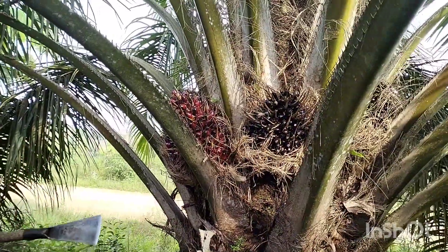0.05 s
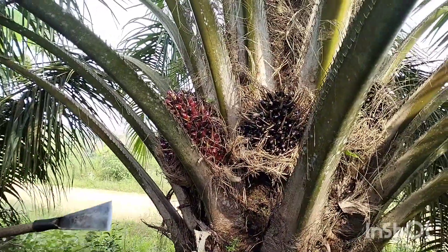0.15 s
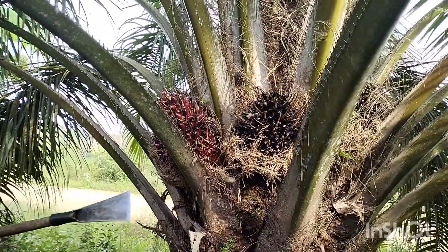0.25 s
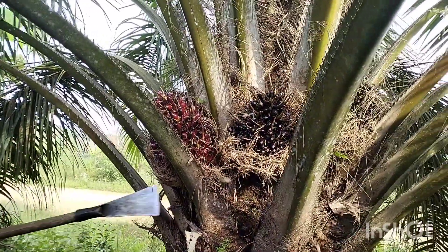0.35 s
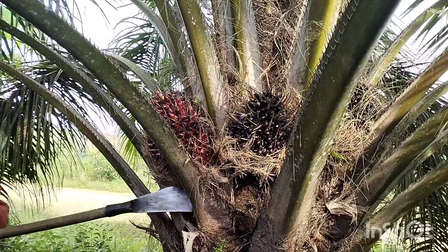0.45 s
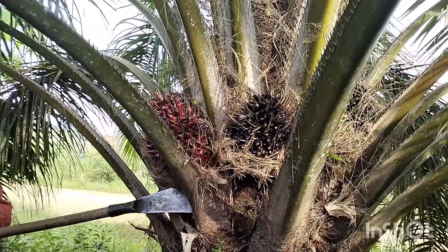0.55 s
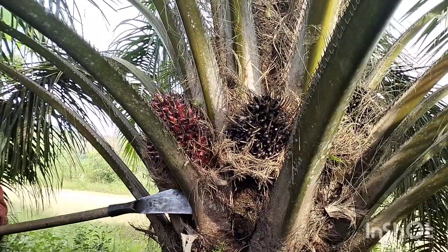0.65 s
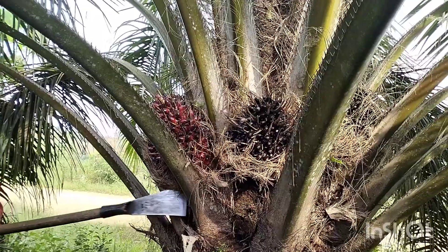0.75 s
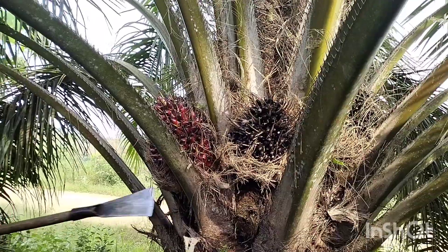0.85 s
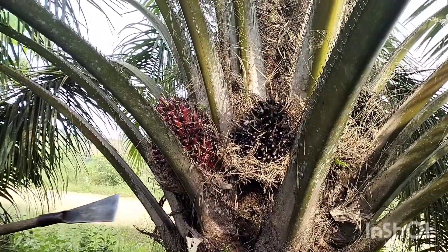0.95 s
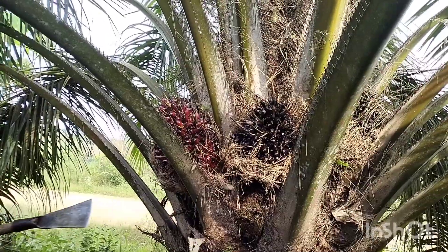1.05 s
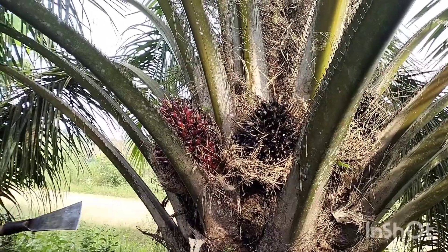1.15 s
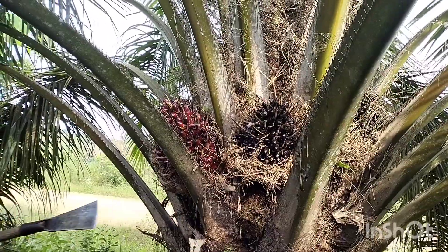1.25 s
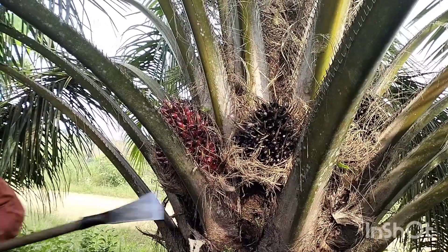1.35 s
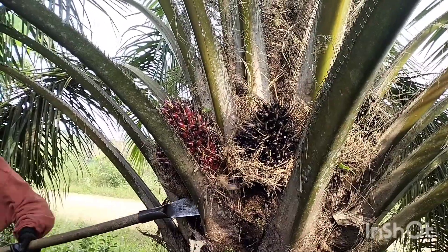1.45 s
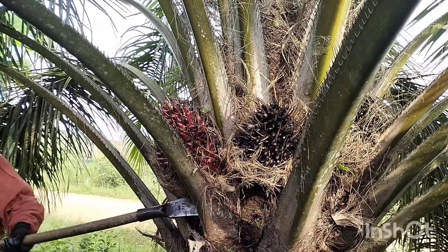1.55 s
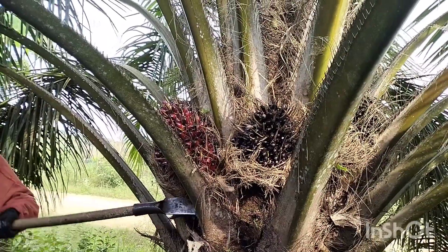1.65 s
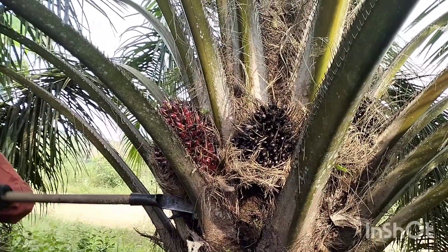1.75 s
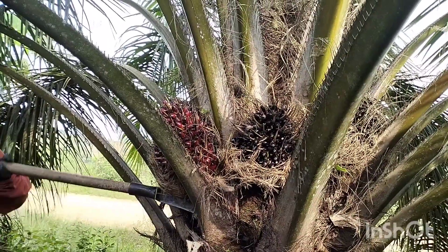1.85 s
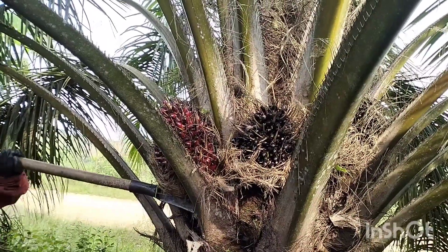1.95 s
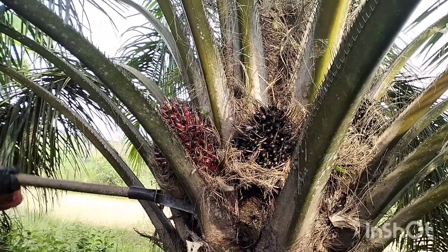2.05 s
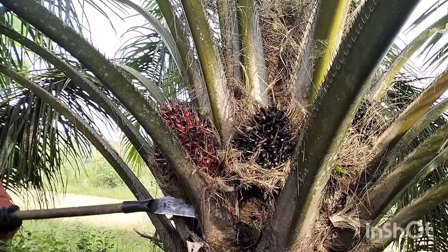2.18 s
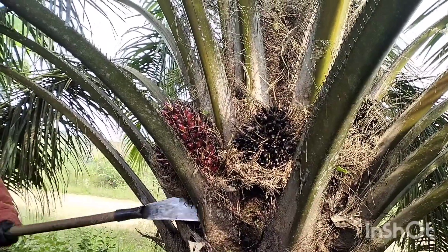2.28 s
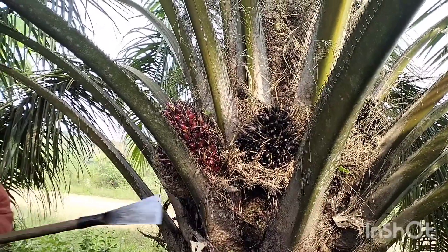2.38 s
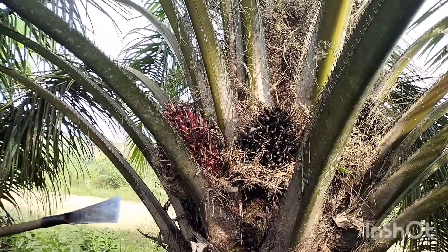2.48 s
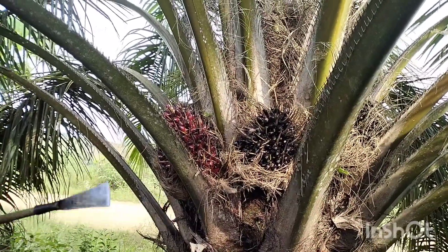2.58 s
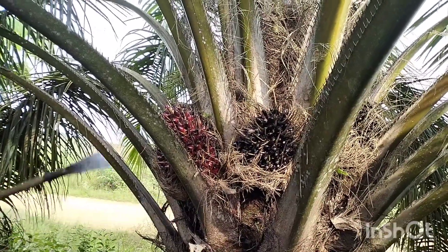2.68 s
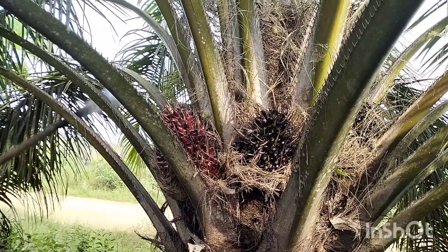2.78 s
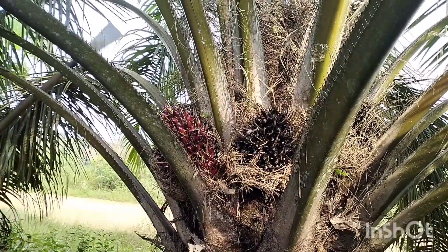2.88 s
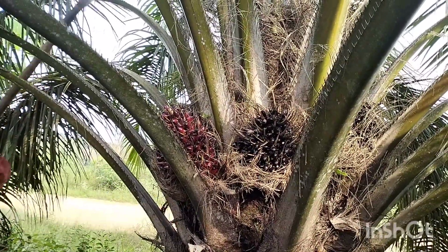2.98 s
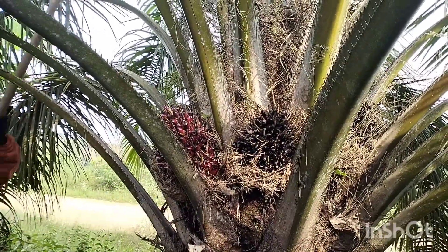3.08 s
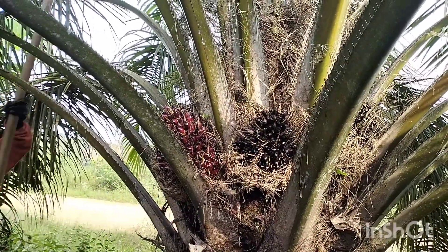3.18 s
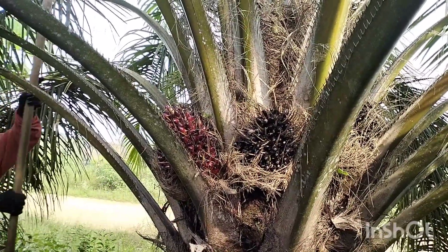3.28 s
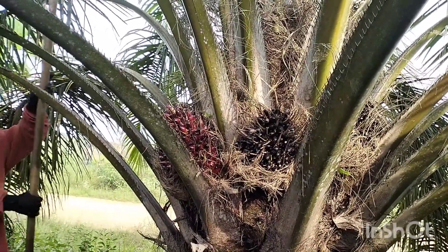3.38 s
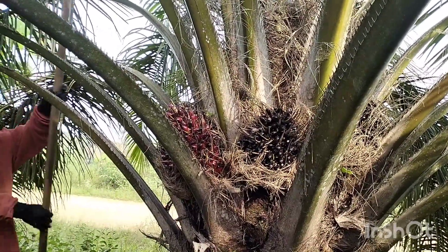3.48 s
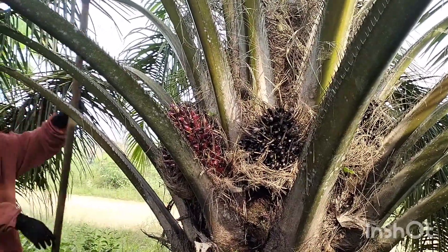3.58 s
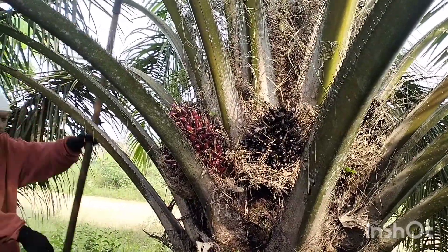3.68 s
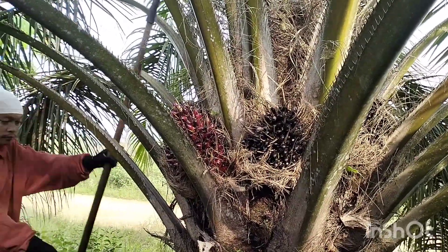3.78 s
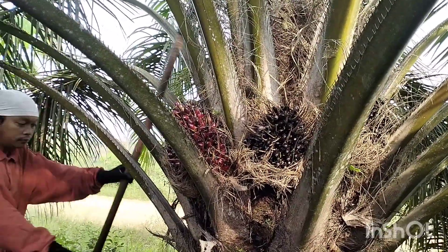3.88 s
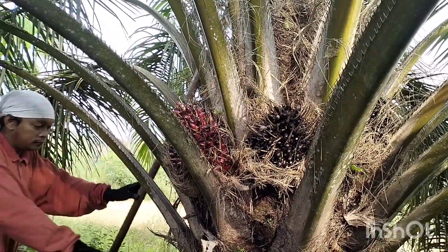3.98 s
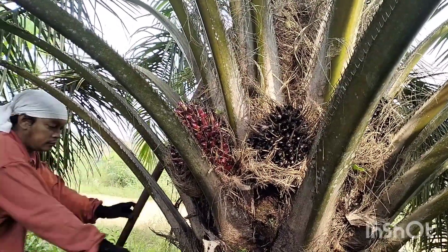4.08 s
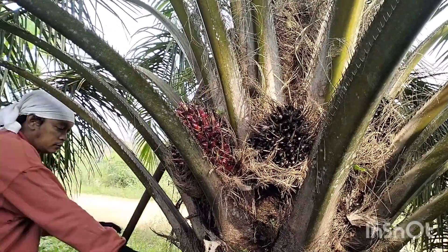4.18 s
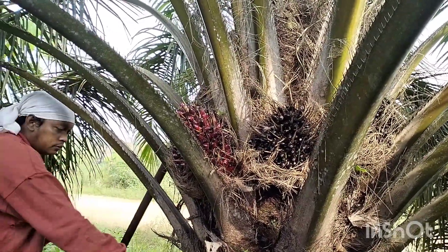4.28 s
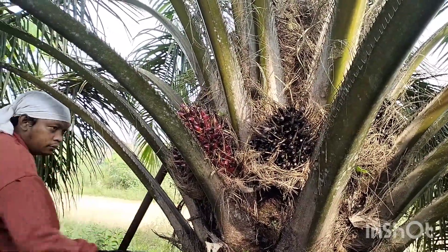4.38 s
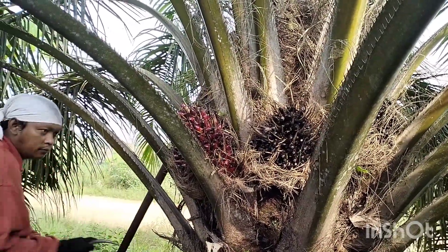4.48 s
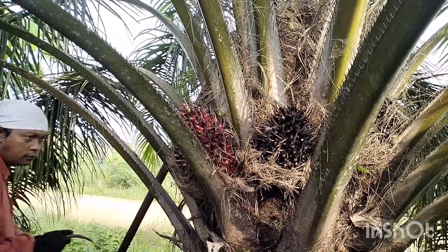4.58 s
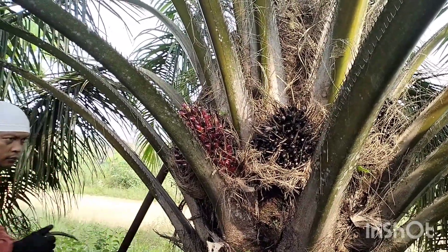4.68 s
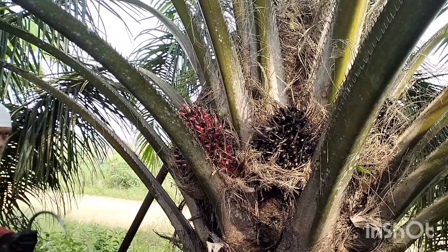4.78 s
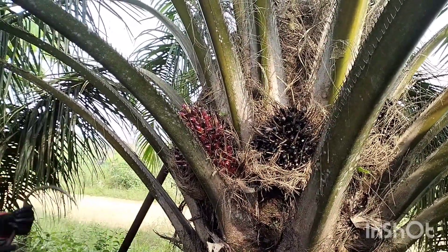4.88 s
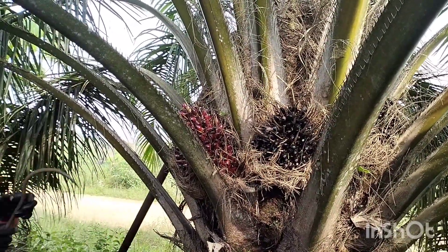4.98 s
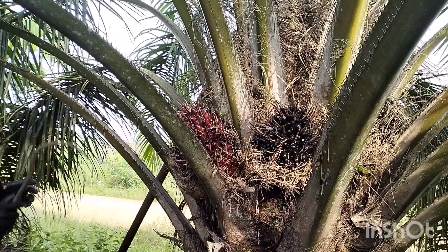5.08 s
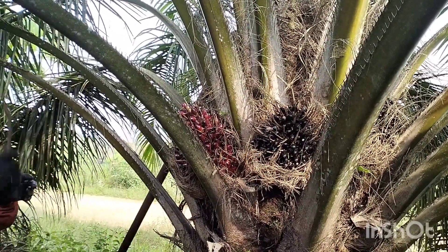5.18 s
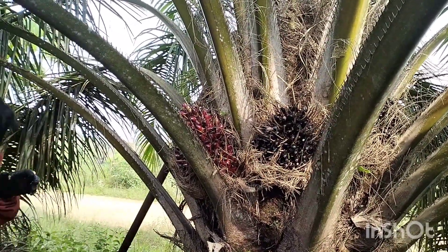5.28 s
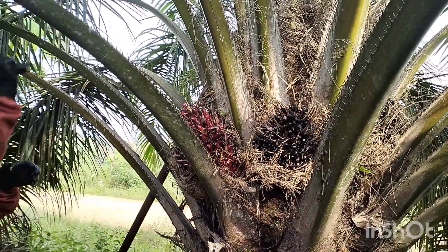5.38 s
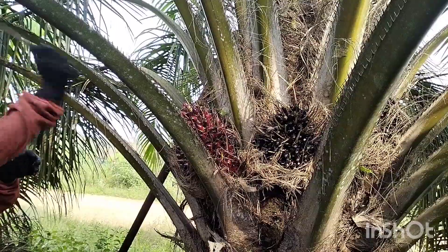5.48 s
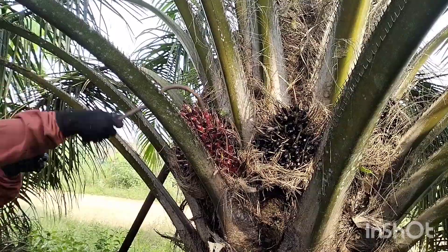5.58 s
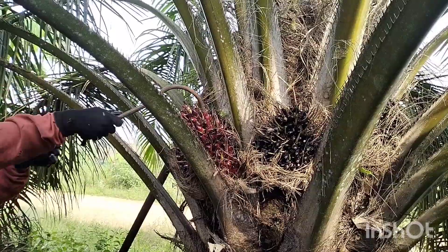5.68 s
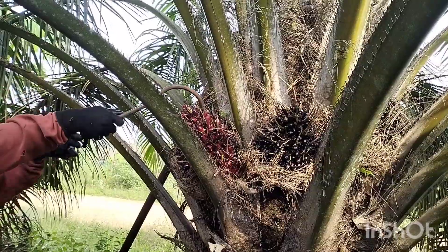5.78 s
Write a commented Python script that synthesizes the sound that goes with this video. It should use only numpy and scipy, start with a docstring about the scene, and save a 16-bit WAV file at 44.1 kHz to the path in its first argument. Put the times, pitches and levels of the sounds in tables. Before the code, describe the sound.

A blade on a pole bites into a wet palm frond base, which creaks and tears, over shrill insects and a distant engine rumble.

```python
"""Insects shrill, a far engine rumbles and leaves stir; a few far birds call as a chisel on a pole works on an oil palm.
The blade bites into a wet frond base, then is levered until the fibres creak and tear; knocks and leaf sweeps follow.
Insects, air and rumble are filtered noise; the engine note, birds and knocks are swept or damped sines.
Bites and creaks are pulses of snapping fibres that drive resonances of the frond and scatter through the crown."""
import sys
import numpy as np
from scipy import signal
from scipy.fft import rfft, irfft, next_fast_len
from scipy.io import wavfile
from scipy.ndimage import uniform_filter1d

SR = 44100
rng = np.random.default_rng(int(sys.argv[2]) if len(sys.argv) > 2 else 0)


def digitize_waveform(pressure):
    """Quantize a signal to 16-bit integers and store it at the path in sys.argv[1].

    Rows of a 2-D input are taken as channels; values are limited to [-1, 1].
    """
    field = np.atleast_2d(pressure).T
    bounded = np.clip(field, -1, 1)
    quanta = np.round(bounded * 32767).astype(np.int16)
    wavfile.write(sys.argv[1], SR, quanta)


N = 257575
TIME_S = np.arange(N) / SR
BLOW_SAMPLES = SR // 3  # span of one blow

# Table levels are relative; trims in the functions add to them. Spectra: f/Hz, level per Hz/dB.
# far engine, firing rate: t/s, f/Hz
ENGINE_SPEED = [(0, 151.8), (4.4, 158.1), (4.85, 180.1), (5.84, 184.2)]
# far engine, rumble spectrum: f/Hz, level/dB
RUMBLE_SPECTRUM = [(12, -55), (20, -41.5), (33, -13.5), (60, -7), (75, -9.5), (119, 2.5), (150, -1),
                   (177, 1.5), (195, -2.5), (211, -15), (330, -22.5), (430, -54.5), (730, -120)]
# hush of the plantation, spectrum: f/Hz, level/dB
AIR_SPECTRUM = [(200, -8.5), (300, -2.5), (420, -3), (750, 3), (1100, -3.5), (2400, -0.5), (3800, -9.5),
                (8500, -31), (11000, -17.5), (13500, -10), (15000, -22.5)]
# far insect chorus, spectrum: f/Hz, level/dB
INSECT_SPECTRUM = [(3700, -36.5), (4100, -10), (4500, 1.5), (4850, -4), (5250, 2), (5550, -3.5),
                   (5900, -13.5), (6400, -5.5), (7200, -8), (7800, -44)]
# blade or sleeve sweeping past leaves: closest touch t/s, swell time/s, rub level/dB, dry rustle level/dB
LEAF_SWEEPS = [(2.158, 0.059, -43.5, -64), (2.335, 0.066, -34.5, -55.5), (3.56, 0.29, -55.5, -56),
               (3.87, 0.075, -55, -52.5), (4.127, 0.037, -36.5, -38.5), (4.732, 0.028, -46, -57),
               (5.21, 0.1, -48.5, -49)]
# light taps on dry leaf stubs: t/s, level/dB
STUB_TAPS = [(0.835, -39), (0.854, -38.5), (2.086, -38), (2.328, -25.5), (2.752, -43.5), (3.24, -44),
             (3.703, -31), (4.638, -37)]
# leaf rub and stub tap, spectrum: f/Hz, level/dB
RUB_SPECTRUM = [(200, -25.5), (450, 3), (900, 1), (1500, -2), (2500, -1.5), (4000, -14), (8000, -24.5),
                (14000, -24)]
# dry leaf rustle, spectrum: f/Hz, level/dB
RUSTLE_SPECTRUM = [(2000, -1.5), (4000, 7), (7000, -4), (10000, 0), (13000, 2), (15000, -5)]
# far bird calls: t/s, length/s, start f/Hz, end f/Hz, level/dB
BIRD_CALLS = [(0.512, 0.12, 2320, 2300, -41.5), (0.946, 0.075, 2350, 2070, -48),
              (4.70, 0.06, 1640, 1800, -43), (4.772, 0.071, 3050, 3200, -48),
              (4.904, 0.09, 2770, 2203, -46), (4.978, 0.08, 2910, 3010, -45.5)]
# blade or pole striking the palm: t/s, time until the blade stops/s, stalk level/dB, low weight level/dB,
# crack level/dB, splinter level/dB, splinter dryness/(dB per octave), best-driven f/Hz
BITES = [(0.592, 0.012, -19, -28, -23.5, -26, -4, 433), (1.519, 0.023, -8.5, -13, -11.5, -18, -2, 435),
         (2.396, 0.0052, -26, -38, -25, -30.5, 4, 607), (2.421, 0.0034, -39, -42.5, -34.5, -44, 6, 580),
         (4.089, .009, -19.5, -33, -24.5, -19.5, 3, 539), (4.155, .004, -33, -41, -31.5, -36, -2, 524),
         (4.171, 0.0052, -35, -42, -29, -34.5, -0.5, 520), (5.504, 0.0031, -55, -65, -40.5, -38.5, 1, 700),
         (5.688, .005, -17.5, -17, -24.5, -19.5, -3.5, 490)]
# modes of the struck frond base: f/Hz, width/Hz, level/dB
STALK_MODES = [(409, 16, -2), (490, 89, 9.5), (554, 59, 8.5), (760, 110, 4), (875, 51, 13),
               (1327, 110, -5.5), (1940, 110, 1), (2170, 80, -5.5), (3320, 190, -5)]
# low weight of a bite, spectrum: f/Hz, level/dB
WEIGHT_SPECTRUM = [(60, -22), (130, -6.5), (260, 11.5), (340, -1), (600, -43.5)]
# cracking fibres, spectrum: f/Hz, level/dB
CRACK_SPECTRUM = [(600, -18.5), (1200, -7), (1800, -4), (2400, -1), (3300, -9.5), (4500, -28.5),
                  (8000, -41)]
# splintering fibres before the dryness tilt, spectrum: f/Hz, level/dB
SPLINTER_SPECTRUM = [(2200, -23.5), (3600, 0.5), (5000, 1), (7000, -3), (9500, -6), (12800, -1),
                     (15000, -11)]
# dull knocks of pole, trunk and feet: t/s, level before the soft rise/dB, f/Hz, t60/s
KNOCKS = [(0.832, -29, 622, 0.057), (1.554, -10.5, 123, 0.11), (2.162, -25, 389, 0.086),
          (3.717, -27.5, 68, 0.15), (5.693, -22, 187, 0.17), (5.694, -29, 71, 0.13)]
# jerks of the wedged blade, a faint one first, then hard ones: t/s, level/dB
JERKS = [(1.645, -32.5), (1.651, -12), (1.695, -13.5), (1.699, -13), (1.711, -16), (1.771, -9)]
# effort of levering, as creak level: t/s, level/dB
LEVER_EFFORT = [(1.69, -18.5), (1.698, 1), (1.704, -15.5), (1.8, -12), (1.844, -23.5), (1.888, -23.5),
                (1.914, -33), (1.99, -24)]
# modes of the frond with the blade wedged in it: f/Hz, width/Hz, level/dB
WEDGED_MODES = [(181, 75, -14.5), (253.3, 23, -7.5), (336, 48, -7), (398, 41.5, 1.5), (512, 27, -1),
                (642, 53, -2.5), (815, 54, -8), (880, 40, -4.5), (965, 71, 0.5), (1183, 71, -11),
                (1400, 80, -9.5), (1912, 190, -12), (2324, 96, -15.5)]
# snap of a slipping blade, spectrum: f/Hz, level/dB
SNAP_SPECTRUM = [(500, -4.5), (1000, -3.5), (1500, -9), (2300, -2), (2900, -9), (3600, -13.5),
                 (5200, -23.5), (7000, -30.5), (14000, -37.5)]
# hiss of fine fibres parting, spectrum: f/Hz, level/dB
TEAR_SPECTRUM = [(1500, -13), (2600, -6), (3600, -5.5), (5500, -4), (8000, -14), (10500, -18.5),
                 (13000, -14), (15000, -32)]
# left-right likeness of near sounds: f/Hz, likeness/(0-1)
LIKENESS = [(560, 1), (700, 0.27), (1300, 0.2), (2300, 0.5), (3300, 0)]
# balance of near sounds: f/Hz, left minus right/dB
BALANCE = [(150, 8), (500, 6), (1300, -2), (2400, -7), (4400, -2.5), (8000, -1), (13000, -2.5)]

# surroundings: rise at the start, then a late swell; the engine note swells all along
OPENING_S, OPENING_DB = 0.71, 4.5
SWELL_FROM_S, ENGINE_DB_PER_S, AIR_DB_PER_S = 2.9, 1.1, 1.8
# engine drone: level before the opening rise, growth all along, broad resonance
DRONE_DB, DRONE_DB_PER_S, DRONE_HZ, DRONE_WIDTH_HZ = -69.5, 2.5, 508, 370
# nearer insect; FIRST_THROB_S is the first peak
THROBS_PER_S, FIRST_THROB_S, THROB_DEPTH = 5.6, .089, .9
SWEEP_RELEASE_SHARE = 0.8  # a sweep dies away a little faster than it swells
# after the stop the fibres settle in a share of the cutting time, up to a limit
SETTLE_SHARE, SETTLE_MAX_S = 0.94, 0.007
# as the load builds, the blade slips at even steps, each weaker than the last
FIRST_SLIP_S, FIRST_GAP_S, FIRST_DB, FIRST_LOSS_DB = 1.658, 0.0094, -17.5, 1.5
# the frond gives way
GIVE_S, GIVE_ATTACK_S, GIVE_END_S, GIVE_RELEASE_S = 1.695, 0.022, 1.93, .03
# as the load eases, slips draw apart and grow; going back from the last, each extra wait is a share of the next
LAST_SLIP_S, SHORTEST_GAP_S, LAST_WAIT_S, WAIT_SHARE = 2.0075, .0063, .0145, .42
LAST_DB, LAST_GROWTH_DB = -21.0, 1.0
# snap level for a slip of 0 dB, and the share by which it follows the slip level
SLIP_SNAP_DB, SNAP_FOLLOWS = -12.5, 0.69
CUTOFF_HZ = 14450


def from_db(db):
    """Decibels to gain."""
    return 10 ** (np.asarray(db) / 20)


def rms_one(x):
    """Scale to rms 1."""
    return x / np.sqrt(np.mean(x ** 2) + 1e-20)


def burst_one(x):
    """Scale a short sound to the energy of 20 ms at rms 1."""
    return rms_one(x) * np.sqrt(SR / 50 / x.shape[-1])


def ramp(t, start, length):
    """Rise in a straight line from 0 to 1."""
    return np.clip((t - start) / length, 0, 1)


def in_time(rows):
    """Interpolate the columns of a curve at every sample."""
    s, *columns = np.transpose(rows)
    return [np.interp(TIME_S, s, column) for column in columns]


def at_hz(points, hz):
    """Read a spectrum on a log-frequency axis."""
    points = np.array(points)
    return np.interp(np.log(hz + 1), np.log(points[:, 0]), points[:, 1])


def drift(knots_per_s):
    """Slow chance: straight lines between random knots of spread 1."""
    knots = rng.standard_normal(4096)
    return np.interp(TIME_S * knots_per_s, np.arange(len(knots)), knots)


def add(out, s, sound):
    """Mix a sound in at time s."""
    at = int(s * SR)
    out[..., at:at + sound.shape[-1]] += sound[..., :N - at]


def colour(x, spectrum):
    """Causal (minimum-phase) filter with the given spectrum, falling away below its first point."""
    size = 2 * next_fast_len(x.shape[-1] // 2 + 2048)
    hz = np.fft.rfftfreq(size, 1 / SR)
    gain = from_db(at_hz(spectrum, hz)) * np.clip(hz / spectrum[0][0], .1, 1) ** 2
    # fold the cepstrum onto positive time: minimum phase
    cepstrum = irfft(np.log(gain))
    cepstrum[1:size // 2] *= 2
    cepstrum[size // 2 + 1:] = 0
    response = np.exp(rfft(cepstrum))
    return irfft(rfft(x, size) * response)[..., :x.shape[-1]]


def near(pair):
    """Two unrelated signals become left and right, with likeness and balance set by frequency."""
    size = 2 * next_fast_len(pair.shape[-1] // 2 + 512)
    hz = np.fft.rfftfreq(size, 1 / SR)
    mid, side = rfft(pair, size)
    alike = np.clip(at_hz(LIKENESS, hz), 0, 1)
    sign = np.array([[1], [-1]])
    both = np.sqrt(1 + alike) * mid + sign * np.sqrt(1 - alike) * side
    both = both * from_db(sign * at_hz(BALANCE, hz) / 2)
    return irfft(both)[..., :pair.shape[-1]]


def resonate(x, hz, width_hz):
    """One two-pole resonance, gain about 1 on top."""
    r = np.exp(-np.pi * width_hz / SR)
    zeros = np.array([1, 0, -1]) * (1 - r * r) / 2
    poles = [1, -2 * r * np.cos(2 * np.pi * hz / SR), r * r]
    return signal.lfilter(zeros, poles, x + 1e-18)


def grains(size, per_s, spread_db):
    """Fibres snapping at random, in uneven sizes and either sign."""
    sizes_db = spread_db * np.minimum(rng.exponential(1, size), 4)
    sizes = from_db(sizes_db) * rng.choice([-1, 1], size)
    return sizes * (rng.random(size) < per_s / SR)


def broadband(x, width_hz=260):
    """Spread a burst's energy evenly over frequency, so that only the body it drives gives it colour."""
    size = 2 * next_fast_len(x.shape[-1])
    spectrum = rfft(x, size)
    power = uniform_filter1d(np.abs(spectrum) ** 2, int(width_hz * size / SR), axis=-1)
    return irfft(spectrum / np.sqrt(np.abs(power) + 1e-12))[..., :x.shape[-1]]


def scatter(x, early_t60, late_t60, late_db):
    """Two paths through the crown: a quick spray of reflections from stalks, a fainter tail from the leaves."""
    t = TIME_S[:BLOW_SAMPLES]
    decay = from_db(-60 * t / early_t60) + from_db(late_db - 60 * t / late_t60)
    paths = broadband(rng.standard_normal((2, BLOW_SAMPLES)) * decay)
    return signal.fftconvolve(x[None], paths, axes=1)[:, :len(x)]


def evened(x):
    """Hold the 25 ms level of a pulse train steady."""
    power = uniform_filter1d(np.mean(np.atleast_2d(x) ** 2, axis=0), SR // 40)
    return x / np.sqrt(np.abs(power) + 1e-3 * power.mean())


def distance(engine_db=-48.0, air_db=-56.0, side_db=-15.0):
    """A far engine's rumble and drone, nearly alike on both sides, and the diffuse hush: filtered noise."""
    opening_db = OPENING_DB * (ramp(TIME_S, 0, OPENING_S) - 1)
    swelling_s = np.maximum(TIME_S - SWELL_FROM_S, 0)
    mid, side = rng.standard_normal((2, N))
    engine = mid + from_db(side_db) * side * np.array([[1], [-1]])
    rumble_points = RUMBLE_SPECTRUM + [(450, -55.5), (900, -78)]
    rumble = rms_one(colour(engine, rumble_points)) * from_db([[.6], [-.6]])
    drone = resonate(engine, DRONE_HZ, DRONE_WIDTH_HZ)
    drone = rms_one(resonate(drone, DRONE_HZ, DRONE_WIDTH_HZ))
    hush = rms_one(colour(rng.standard_normal((2, N)), AIR_SPECTRUM)) * from_db([[-.8], [.8]])
    return from_db(opening_db) * (from_db(engine_db + ENGINE_DB_PER_S * swelling_s) * rumble
                                  + from_db(DRONE_DB + DRONE_DB_PER_S * TIME_S) * drone
                                  + from_db(air_db + AIR_DB_PER_S * swelling_s) * hush)


def engine_note(note_db=-56.5, waver_hz=1.99, fade_db=3.0):
    """The far engine's firing note: a wavering sine, fading in and out on its way through the trees."""
    hz = in_time(ENGINE_SPEED)[0] + waver_hz * drift(8)
    level_db = note_db + ENGINE_DB_PER_S * TIME_S + fade_db * drift(6.8)
    return from_db(level_db) * np.sin(2 * np.pi * np.cumsum(hz) / SR)


def insects(chorus_db=-51.0, singer_db=-55.0, singer_hz=5260, buzz_per_s=88, buzz_depth=0.36):
    """A nearly steady far chorus, and one nearer insect: resonant noise whose buzz comes in throbs."""
    chorus = rms_one(colour(rng.standard_normal((2, N)), INSECT_SPECTRUM)) * from_db(0.3 * drift(45))
    song = resonate(rng.standard_normal((2, N)), singer_hz, 470)
    song = rms_one(resonate(song, singer_hz, 470))
    throb = 1 + THROB_DEPTH * np.cos(2 * np.pi * THROBS_PER_S * (TIME_S - FIRST_THROB_S))
    buzz = 1 + buzz_depth * np.cos(2 * np.pi * buzz_per_s * TIME_S + 2 * drift(11))
    singer = song * throb * buzz * from_db([[-3], [2.5]])
    return from_db(chorus_db) * chorus + from_db(singer_db) * singer


def leaves(tap_trim_db=-8.5, stir_db=-63.0):
    """The crown always stirs a little; steel and cloth sweep the leaves in fine grains; dry stubs are tapped."""
    rub, rustle = 0, from_db(stir_db)
    for s, swell_s, rub_db, rustle_db in LEAF_SWEEPS:
        away_s = np.maximum(s - TIME_S, (TIME_S - s) / SWEEP_RELEASE_SHARE)
        touch = np.exp(-away_s / swell_s)
        rub = rub + from_db(rub_db) * touch
        rustle = rustle + from_db(rustle_db) * touch
    out = np.zeros((2, N))
    for gain, spectrum in ((rub, RUB_SPECTRUM), (rustle, RUSTLE_SPECTRUM)):
        friction = grains(N, per_s=3000, spread_db=1.0) * from_db(3.7 * drift(60))
        spray = scatter(friction, early_t60=0.0034, late_t60=0.14, late_db=-14.0)
        out += gain * rms_one(colour(near(spray), spectrum))
    for s, db in STUB_TAPS:
        tap = scatter(signal.unit_impulse(BLOW_SAMPLES), early_t60=0.012, late_t60=0.12, late_db=-7.5)
        add(out, s, from_db(db + tap_trim_db) * burst_one(colour(near(tap), RUB_SPECTRUM)))
    return out


def birds(hoarse_hz=100, arch_hz=60):
    """Short, hoarse, slightly arched sine glides, blurred by the plantation."""
    out = np.zeros(N)
    for s, length_s, start_hz, end_hz, db in BIRD_CALLS:
        size = int(length_s * SR)
        swell = np.hanning(size)
        hz = np.linspace(start_hz, end_hz, size) + arch_hz * swell + hoarse_hz * drift(510)[:size]
        add(out, s, from_db(db) * swell * np.sin(2 * np.pi * np.cumsum(hz) / SR))
    return scatter(out, early_t60=0.015, late_t60=0.19, late_db=-17)


def bites(weight_trim_db=-5.0, contact=14.2, stop=6.5, load_db_per_s=250, tilt_db_per_octave=0.5,
          splinter_lasts=1.5, graze_db=-14.5, graze_s=.003, focus_db=14.5, focus_octaves=0.14):
    """The edge grazes, hits, cuts fibres that crack and splinter, and loads the stalk until it stops."""
    out = np.zeros((2, N))
    t = TIME_S[:BLOW_SAMPLES] - graze_s
    entry = np.where(t < 0, from_db(graze_db), 1)
    for s, cut_s, stalk_db, weight_db, crack_db, splinter_db, dryness, best_hz in BITES:
        fibres = entry * rms_one(grains(BLOW_SAMPLES, per_s=3500, spread_db=1.5))
        settling = np.maximum(t - cut_s, 0) / min(SETTLE_SHARE * cut_s, SETTLE_MAX_S)
        force = fibres * np.exp(-settling)
        force[np.argmax(t >= 0)] += contact
        force[np.argmax(t >= cut_s)] += stop
        push = broadband(force * from_db(load_db_per_s * np.clip(t, 0, cut_s)))

        body = 0
        for hz, width_hz, db in STALK_MODES:
            # the place of the cut favours some modes
            focus = np.exp(-(np.log2(hz / best_hz) / focus_octaves) ** 2)
            drive_db = focus_db * focus + tilt_db_per_octave * np.log2(hz)
            mode = rms_one(resonate(push, hz, width_hz))
            body = body + from_db(db + drive_db) * np.sqrt(width_hz) * mode
        thud = from_db(stalk_db) * burst_one(body)
        thud = thud + from_db(weight_db + weight_trim_db) * burst_one(colour(push, WEIGHT_SPECTRUM))

        cracks = scatter(broadband(force), early_t60=0.0037, late_t60=0.13, late_db=-23.5)
        cracks = colour(near(cracks), CRACK_SPECTRUM)
        splitting = broadband(fibres * np.exp(-settling / splinter_lasts))
        tilted = [(hz, db + dryness * np.log2(hz)) for hz, db in SPLINTER_SPECTRUM]
        chips = scatter(splitting, early_t60=0.012, late_t60=0.19, late_db=-19.5)
        chips = colour(near(chips), tilted)
        bright = from_db(crack_db) * burst_one(cracks) + from_db(splinter_db) * burst_one(chips)
        add(out, s - graze_s, thud * from_db([[.9], [-.9]]) + bright)
    return out


def knocks(rise_s=0.0026):
    """Soft, heavy contacts: one damped sine each."""
    out, t = np.zeros(N), TIME_S[:BLOW_SAMPLES]
    for s, db, hz, t60_s in KNOCKS:
        envelope = from_db(db - 60 * t / t60_s) * (1 - np.exp(-t / rise_s))
        add(out, s, envelope * np.sin(2 * np.pi * hz * t))
    return out


def wedged(x):
    """The levered frond rings in its modes; it is too narrow to radiate deep bass."""
    rings = 0
    for k, (hz, width_hz, db) in enumerate(WEDGED_MODES):
        rings = rings + (-1) ** k * from_db(db) * resonate(x, hz, width_hz)
    return signal.sosfilt(signal.butter(2, 120, "high", fs=SR, output="sos"), rings)


def first_slips(count=4):
    """Evenly spaced slips as the load builds: (t/s, level/dB)."""
    return [(FIRST_SLIP_S + k * FIRST_GAP_S, FIRST_DB - k * FIRST_LOSS_DB) for k in range(count)]


def last_slips(count=7):
    """Slips that slow to a halt, counted back from the last: (t/s, level/dB)."""
    gaps_s = SHORTEST_GAP_S + LAST_WAIT_S * WAIT_SHARE ** np.arange(count)
    return [(LAST_SLIP_S - gaps_s[:k].sum(), LAST_DB - k * LAST_GROWTH_DB) for k in range(count)]


def creak(slips_per_s=195, jitter=.33, uneven_db=3.5, creak_trim_db=7.0, tear_trim_db=-2.0,
          tear_follows=0.86, fibre_share=0.056, hiss_db=-15.0):
    """Stick-slip of the blade: single slips, a fast ragged run as the frond gives, single slips again."""
    run = np.zeros(N)
    chance = rng.standard_normal((400, 2))
    times_s = GIVE_S + np.cumsum(np.exp(jitter * chance[:, 0])) / slips_per_s
    run[np.minimum(times_s * SR, N - 1).astype(int)] = from_db(uneven_db * chance[:, 1])
    effort_db, = in_time(LEVER_EFFORT)
    pressing = ramp(TIME_S, GIVE_S, GIVE_ATTACK_S) - ramp(TIME_S, GIVE_END_S, GIVE_RELEASE_S)
    fibres = run + fibre_share * grains(N, per_s=2400, spread_db=5.5)
    spray = scatter(fibres, early_t60=.005, late_t60=.1, late_db=-26)
    # fine fibres part all through the run, as a smooth hiss under the snaps
    hiss = rms_one(colour(near(rng.standard_normal((2, N))), TEAR_SPECTRUM))
    tearing = evened(colour(near(spray), SNAP_SPECTRUM)) + from_db(hiss_db) * hiss
    creaking = from_db(effort_db + creak_trim_db) * evened(wedged(fibres))
    out = pressing * (creaking + from_db(tear_follows * effort_db + tear_trim_db) * tearing)

    click = signal.unit_impulse(BLOW_SAMPLES)
    ring = burst_one(wedged(click))
    for s, db in first_slips() + JERKS + last_slips():
        snap = scatter(click, early_t60=0.0048, late_t60=0.11, late_db=-18)
        snap = burst_one(colour(near(snap), SNAP_SPECTRUM))
        add(out, s, from_db(db) * ring + from_db(SLIP_SNAP_DB + SNAP_FOLLOWS * db) * snap)
    return out


def scene():
    """The work on the palm in front of its surroundings."""
    surroundings = distance() + engine_note() + insects() + birds()
    work = leaves() + bites() + knocks() + creak()
    return surroundings + work


def record(dry, threshold_db=-13.5, squeeze=0.55, release_db_per_s=12.5):
    """Gain control ducks under loud work and recovers slowly; peaks are rounded, the top is cut."""
    # power smoothed over 1/60 s
    power = signal.lfilter([1], [1, -np.exp(-60 / SR)], np.mean(dry ** 2, axis=0)) * 60 / SR
    wanted_db = squeeze * np.maximum(10 * np.log10(power + 1e-12) - threshold_db, 0)
    release_db = release_db_per_s * TIME_S
    duck_db = np.maximum.accumulate(wanted_db + release_db) - release_db
    rounded = 0.94 * np.tanh(dry * from_db(-duck_db) / 1.17)
    # a small microphone loses the deepest bass
    lean = signal.sosfilt(signal.butter(2, 32, "high", fs=SR, output="sos"), rounded)
    return signal.sosfilt(signal.ellip(10, .2, 80, CUTOFF_HZ, fs=SR, output="sos"), lean)


dry = scene()
out = record(dry)
digitize_waveform(out)
```